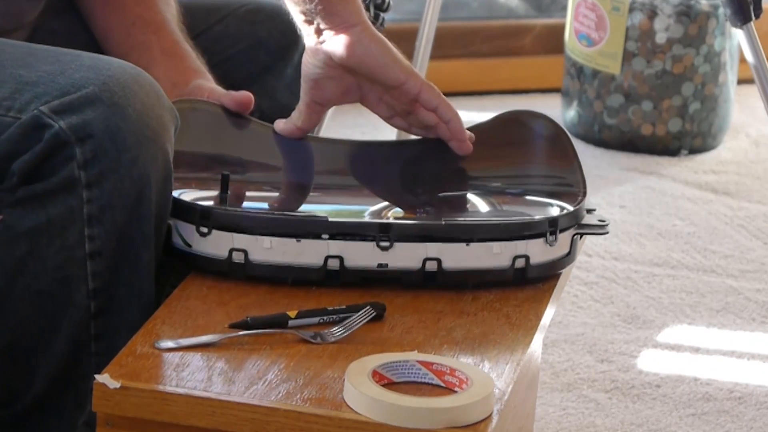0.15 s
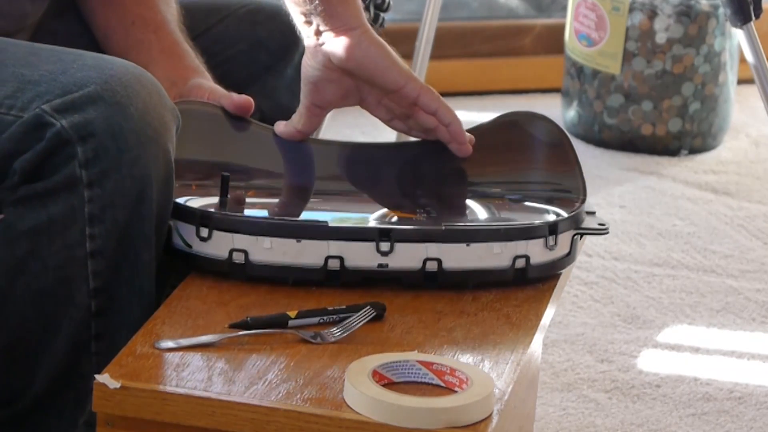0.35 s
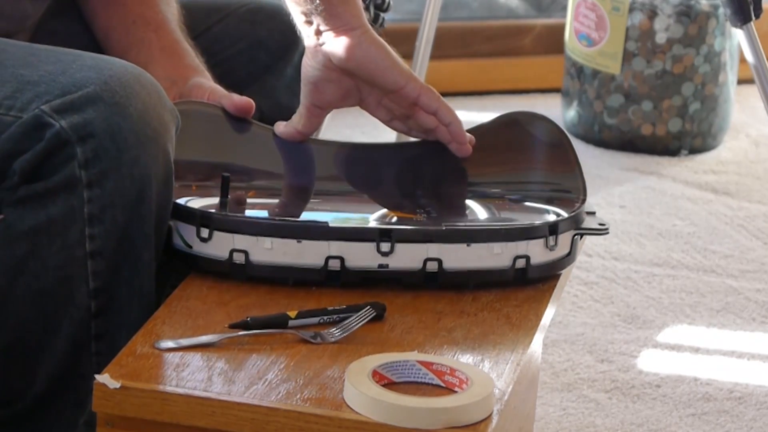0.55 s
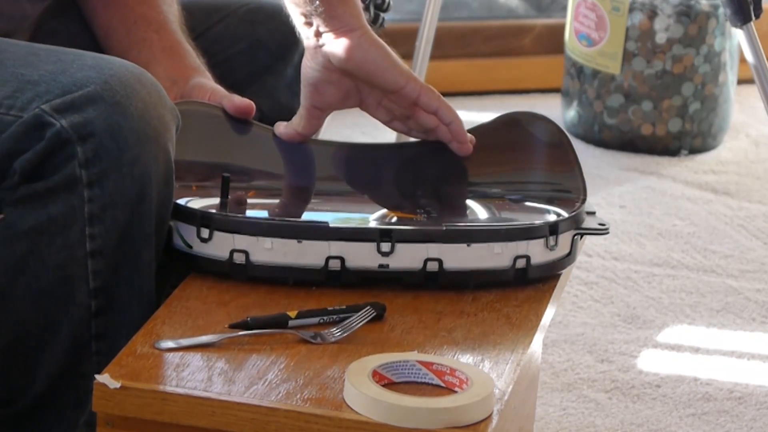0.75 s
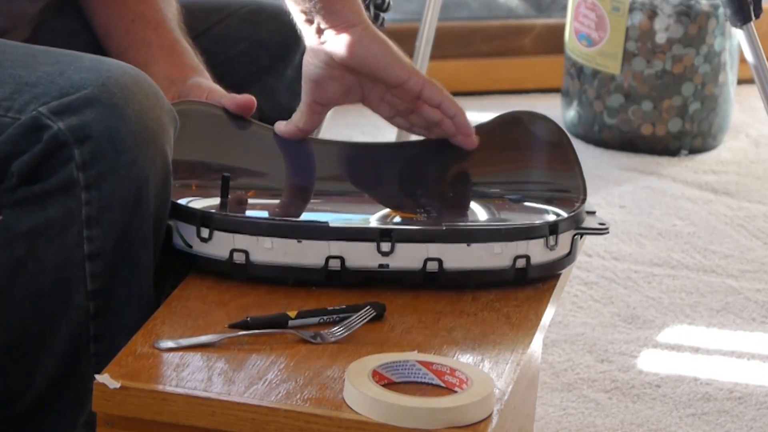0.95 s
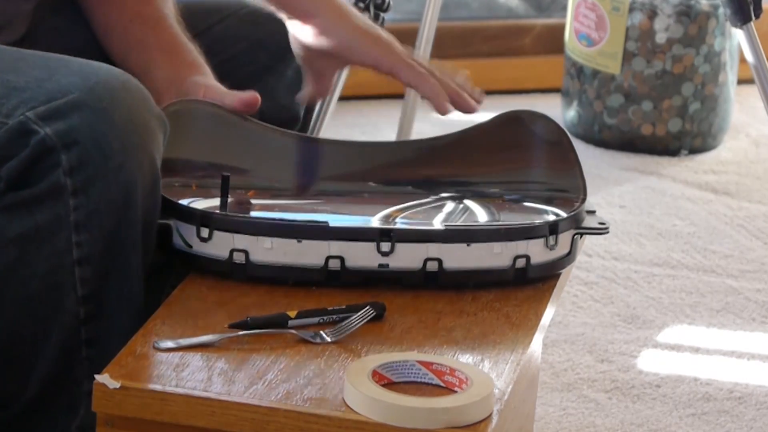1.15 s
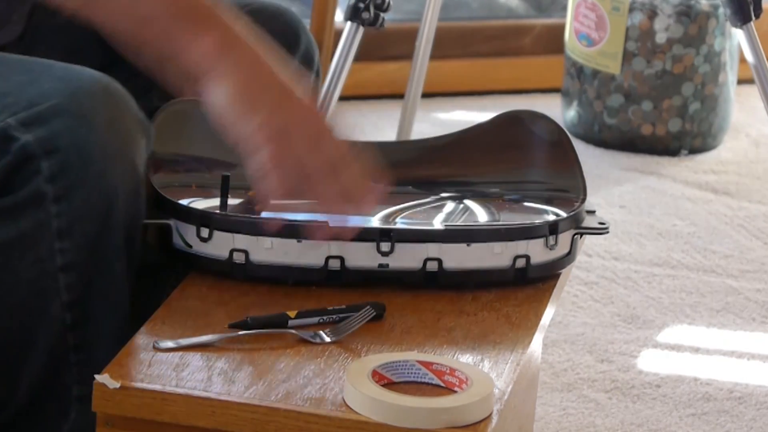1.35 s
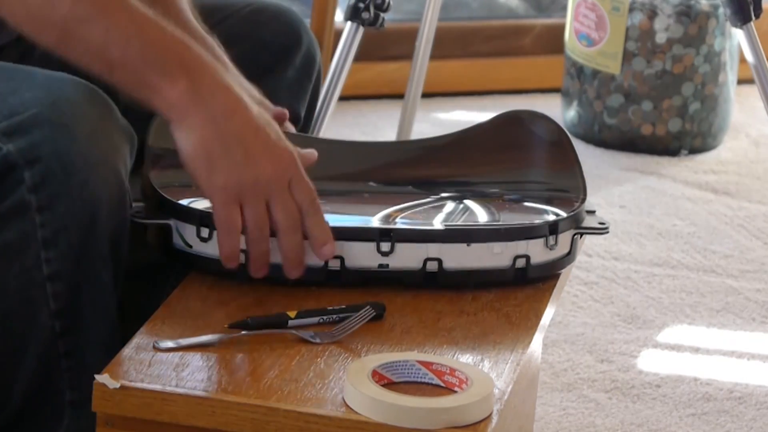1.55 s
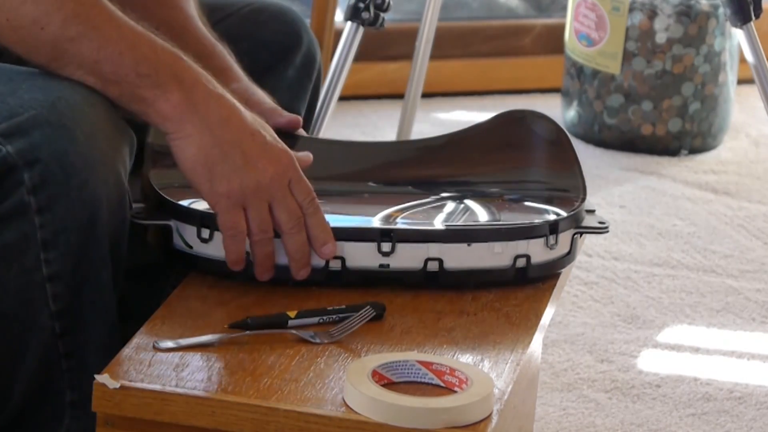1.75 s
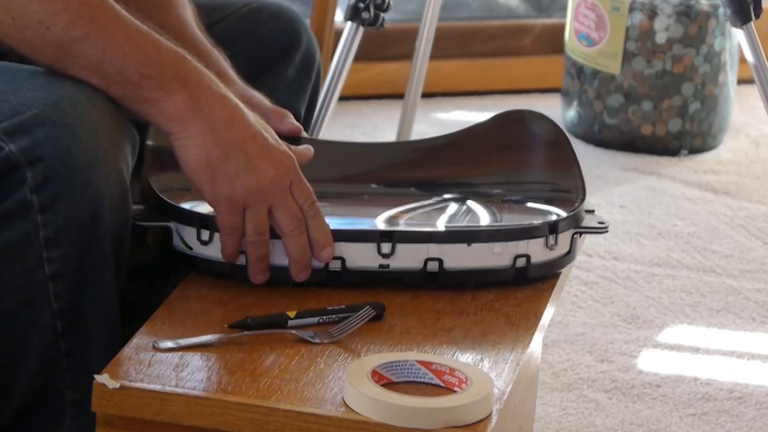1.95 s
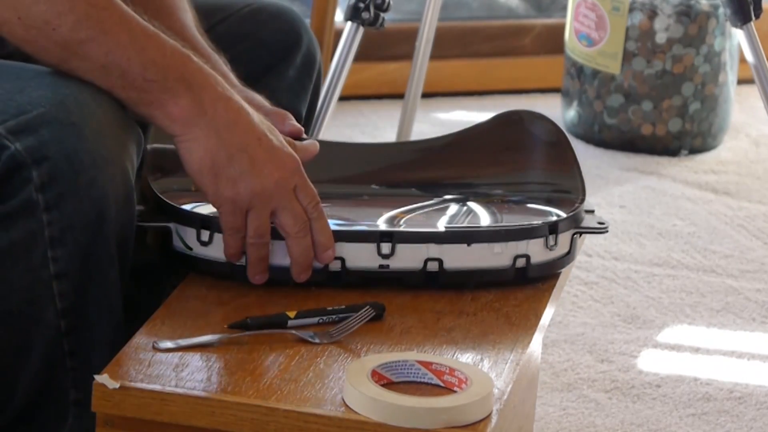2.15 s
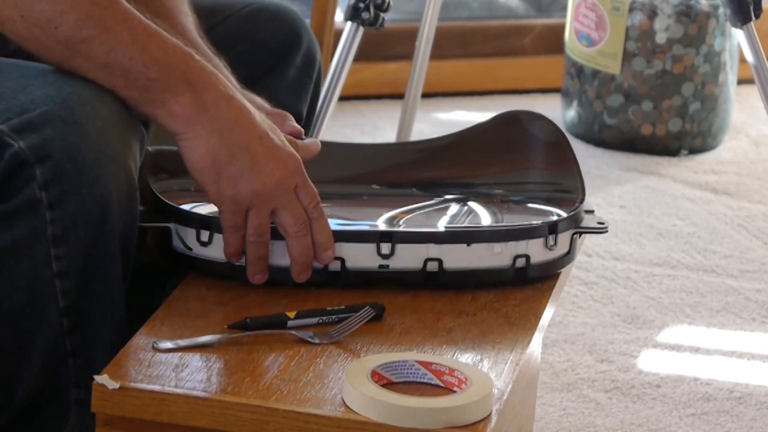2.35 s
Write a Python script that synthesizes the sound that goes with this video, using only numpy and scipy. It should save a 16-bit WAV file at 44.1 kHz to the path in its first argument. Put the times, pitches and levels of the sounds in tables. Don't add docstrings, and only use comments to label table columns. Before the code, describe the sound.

A clear plastic cover snaps sharply onto a hollow housing, loud enough to distort; after a quiet gap come soft knocks, finger rubs, a smaller click and short scrapes, heard close in a carpeted room with faint hum.

```python
import sys
import numpy as np
from scipy import signal
from scipy.io import wavfile

SR = 44100
rng = np.random.default_rng(int(sys.argv[2]) if len(sys.argv) > 2 else 0)


def to_linear_factor(level_db):
    exponent = np.asarray(level_db, float) / 20
    return 10 ** exponent


def bounce(signal):
    frames = np.transpose(np.atleast_2d(signal))
    limited = np.clip(frames, -1, 1)
    pcm = np.round(limited * 32767).astype(np.int16)
    wavfile.write(sys.argv[1], SR, pcm)


N = 105840

# pitch in Hz, level in dB rms, share of wavering noise, width of that noise in Hz.
HUM_LINES = [(59.2, -71, .2, 4), (118.6, -59.5, .15, 5), (238, -56, .5, 14), (441.2, -57, .15, 5),
             (597.5, -69, .3, 5)]
# time in seconds, level in dB.
HUM_SWELL = [
    (0, 1.5),
    (.85, -7),
    (1.2, -3),
    (1.7, 1),
    (2.4, 1.5),
]
# frequency in Hz, level in dB.
TONE_COLOUR = [(25, -25), (70, -11), (180, -8), (400, -6.5), (700, -14.5), (1500, -18.5), (5000, -23.5),
               (15000, -31.5)]
# frequency in Hz, likeness from -1 to 1.
TONE_ALIKE = [(60, 0.88), (180, 0.77), (550, 0.89), (1650, -0.14), (4970, -0.43), (15000, -0.063)]
ROOM_ALIKE = [(60, 0.84), (180, 1), (550, 0.99), (1650, 0.92), (4970, 0.34), (15000, -0.57)]
# frequency in Hz, t60 in seconds.
ROOM_T60 = [(120, 1.5), (300, 0.3628), (700, 0.4659), (2000, 0.482), (5000, 0.4247), (8000, 0.43),
            (12000, 0.2)]
# frequency in Hz, level in dB.
ROOM_COLOUR = [(100, -20.5), (300, 3), (700, 0), (2000, -2), (5000, -2), (9000, -6), (14000, 2)]
# start in seconds, length in seconds, level in dB, brightness in dB per octave.
FINGER_STROKES = [(0, 0.026, -50.5, -0.5), (.02, 0.088, -52.5, 2), (.13, 0.045, -47.5, 0),
                  (.94, 0.049, -51, -10.5), (1.03, 0.02, -48, 2.5), (1.04, 0.046, -38, -1),
                  (1.1, 0.25, -59.5, -4.5), (1.35, 0.32, -77, 3), (1.57, .14, -54.5, 0.5),
                  (1.79, 0.072, -55, -1), (1.965, 0.059, -40.5, -1)]
# start in seconds, length in seconds, level in dB,
# brightness in dB per octave.
DRAG_STROKES = [(0, 0.03, -46, -3), (.03, 0.044, -46.5, -2.5), (.62, 0.17, -55, -5), (1.15, 0.13, -61, -5),
                (1.61, 0.06, -54.5, 0.5), (2.143, 0.031, -44, 0.5), (2.175, .015, -49, 2),
                (2.193, 0.036, -43, 2), (2.236, .03, -46, 1.5), (2.274, .022, -48.5, 2),
                (2.3, 0.034, -52.5, -0.5), (2.326, 0.022, -47.5, 3)]
# frequency in Hz, width in Hz, level in dB.
SKIN_ON_SHELL = [(1370, 2150, -2.5), (2310, 460, -5), (3120, 370, -7), (4500, 1480, -0.5), (6350, 2200, -3),
                 (8950, 570, -6), (12100, 3800, -12)]
BASE_ON_TABLE = [(240, 24, -19), (444, 270, -3), (600, 63, -3.5), (820, 150, -7.5), (1350, 350, -9),
                 (2410, 280, -11.5), (3180, 200, -16), (3480, 420, -20)]
# start in seconds, peak in dB, pitch in Hz, length in seconds.
KNOCKS = [(0.2096, -16.5, 400, 0.0022), (.2132, -13.5, 527, 0.004), (.218, -1.5, 600, 0.004),
          (.232, -13, 600, 0.0028), (.243, -9.5, 537, 0.005), (.563, -36, 535, 0.008),
          (0.576, -45, 490, 0.0072), (.722, -44, 600, 0.0071), (.733, -37, 407, 0.0048),
          (0.867, -50, 450, 0.0073), (0.88, -40.5, 392, 0.0043), (0.934, -36.5, 400, 0.0088),
          (.95, -34.5, 468, 0.0084), (0.966, -23, 386, 0.0091), (0.986, -32.5, 406.5, 0.0172),
          (0.995, -31, 398, 0.0084), (1.01, -37, 377, 0.0099), (1.034, -34, 410, 0.0049),
          (1.07, -43, 630, 0.013), (1.979, -25.5, 615, 0.0043), (1.982, -25, 600, 0.0078),
          (2.009, -24.5, 310, 0.011)]
# start in seconds, peak in dB, brightness in dB per octave,
# share of the hollow body in dB.
SNAPS = [(0.148, -45, -7, -3), (0.16, -43.5, -1, -4), (0.2176, -2, 0.5, -7.5), (0.226, -13.5, 0, -17),
         (0.2327, -17, -5.5, -16), (0.626, -56, 3, -12), (0.9432, -46.5, 13.5, 9), (.951, -45, 5, 1),
         (.972, -42, -9, 0), (1.043, -24, -1.5, -14), (1.052, -34, 4.5, -10), (1.063, -35, -5, -20),
         (1.069, -31, -4.5, -8), (1.077, -33, 5.5, -11.5), (1.084, -45, 4, -6), (1.608, -52, 12, 4.5),
         (1.969, -49, 0, -16), (1.972, -37, -7, -8), (1.9801, -30.5, -8.5, -15), (1.9844, -15.5, 0, -15.5),
         (1.992, -26.5, 4, -14), (2.163, -48, 1, -3), (2.196, -42, -11, -12), (2.204, -56, -8, -13),
         (2.218, -53, 3, -5), (2.24, -47.5, -6.5, -7), (2.276, -62, -5, -14), (2.327, -48.5, -6, -11),
         (2.334, -53, -12, -15)]
# frequency in Hz, level in dB.
COVER_MODES = [(1050, -11), (1300, -13), (1620, -8.5), (2000, -7), (2500, -13), (2950, -5), (3700, -17.5),
               (4500, -5.5), (5250, 2), (6300, -16), (8100, 5.5), (9800, -1.5), (11800, -6), (14300, -0.5)]
SIDE_MODES = [(900, -18), (1300, -14.5), (1750, -10), (2300, -16), (2950, -3.5), (3600, -7), (4250, -0.5),
              (4900, -4.5), (5800, -11), (6900, -14), (8700, -5), (10800, -11), (13000, -23)]
# frequency in Hz, level in dB, t60 in seconds.
BODY_MODES = [(143.6, -32, 0.38), (237.8, -16, 0.27), (267, -17.5, .2), (310, -16.5, .1), (392, -11, 0.17),
              (461, -14, 0.2), (517, -12.5, 0.17), (596.2, -6, 0.12), (625, -11.5, 0.2), (783.3, -16, .15),
              (818, -13.5, 0.13), (964, -10, 0.12), (1104, -12, 0.13)]

TONE_DB = -51
ROOM_DB, FIRST_ECHO_S, EARLY_DB, EARLY_T60_S = -26.5, 0.0014, 2, 0.067
KNOCK_ROOM_DB, BODY_ROOM_DB, CHATTER_ROOM_SHARE = -11.5, -9.5, 0.35
FINGER_GRAINS_PER_S, DRAG_SLIPS_PER_S = 3700, 1000
RUB_FADE = 0.26
SIDE_FROM_S = 0.9
SHELL_DB, SHELL_CYCLES = -1, 11
CRACK_S, CHATTER_S, CHATTER_LOSS_DB = 0.0004, 0.0022, 2.5
BODY_LONGEST_T60_S = 0.35
PAN_DB, PAN_FROM_HZ = 3, 1800
PARTS_FROM_HZ, MIC_CUT_HZ = 120, 17500


def at_hz(points, hz):
    table_hz, values = np.transpose(points)
    return np.interp(np.log(hz), np.log(table_hz), values)


def rms_one(x):
    return x / np.sqrt(np.mean(x ** 2) + 1e-20)


def ring(clicks, hz, t60):
    r = to_linear_factor(-60 / (t60 * SR))
    w = 2 * np.pi * hz / SR
    return signal.lfilter([0, np.sin(w)], [1, -2 * r * np.cos(w), r * r], clicks + 1e-18)


def t60_of(width_hz):
    return np.log(1000) / np.pi / width_hz


def drift(rate):
    r = np.exp(-80 * np.pi * rate / SR)
    slow = signal.lfilter([1], [1, -2 * r, r * r], rng.standard_normal(N // 40 + 2002))[2000:]
    return np.interp(np.arange(N) / 40, np.arange(len(slow)), rms_one(slow))


def bands(likeness, gain, size):
    out = 0
    edges = 22 * 2 ** np.arange(0, 9.6, 0.5)
    white = rng.standard_normal((2, 2, size))
    for k, (low, high) in enumerate(zip(edges, edges[1:])):
        band = signal.butter(2, [low, high], "band", fs=SR, output="sos")
        mid, side = signal.sosfilt(band, white[k % 2])
        hz = np.sqrt(low * high)
        alike = np.clip(at_hz(likeness, hz), -1, 1)
        out = out + gain(hz) * (np.sqrt(1 + alike) * mid + np.sqrt(1 - alike) * side * [[1], [-1]])
    return out


def room_tone():
    tone = bands(TONE_ALIKE, lambda hz: to_linear_factor(at_hz(TONE_COLOUR, hz) + 1.65 * drift(6.7)), size=N)
    return to_linear_factor(TONE_DB) * rms_one(tone)


def appliance_hum():
    t, out = np.arange(N) / SR, 0
    for hz, db, waver, width_hz in HUM_LINES:
        noise = rms_one(ring(rng.standard_normal(N + SR), hz, t60_of(width_hz))[SR:])
        steady = np.sqrt(2) * np.sin(2 * np.pi * hz * t)
        out = out + to_linear_factor(db) * rms_one((1 - waver) * steady + waver * noise)
    return out * to_linear_factor(np.interp(t, *np.transpose(HUM_SWELL)))


def room_echoes(x):
    t = np.arange(SR * 3 // 4) / SR
    early = 1 + to_linear_factor(EARLY_DB - 60 * t / EARLY_T60_S)

    def decay(hz):
        return to_linear_factor(at_hz(ROOM_COLOUR, hz) - 60 * t / at_hz(ROOM_T60, hz))

    echoes = bands(ROOM_ALIKE, decay, size=len(t))
    echoes = echoes * early * np.clip(t / FIRST_ECHO_S - 1, 0, 1)
    return to_linear_factor(ROOM_DB) * signal.fftconvolve(echoes, x[None], axes=1)[:, :N]


def rub(strokes, resonances, per_s, spread_db):
    t, out = np.arange(N) / SR, 0
    slips = rng.random(N) < per_s / SR
    force = to_linear_factor(spread_db * np.minimum(rng.exponential(1, N), 4))
    grains = slips * force * rng.choice([-1, 1], N)
    for k, (hz, width_hz, level_db) in enumerate(resonances):
        octaves = np.log2(hz / resonances[1][0])
        press = 0
        for s, length, db, tilt_db in strokes:
            to_nearest_end = np.minimum(t - s, s + length - t)
            fade = np.clip(to_nearest_end / (RUB_FADE * length), 0, 1)
            press = press + to_linear_factor(db + tilt_db * octaves) * fade
        rung = rms_one(ring(grains * rng.uniform(0.41, 1, N), hz, t60_of(width_hz)))
        out = out + to_linear_factor(level_db - 6.0) * press * rung * (-1) ** k
    return out


def knocks():
    out, t = np.zeros(N + SR), np.arange(SR // 20) / SR
    for s, db, hz, length in KNOCKS:
        swell = np.sin(np.pi * np.clip(t / length, 0, 1))
        start = int(s * SR)
        out[start:start + len(t)] += to_linear_factor(db) * np.sin(2 * np.pi * hz * t) * swell
    return out[:N]


def snaps():
    cover, chatter, body = np.zeros((3, N))
    s, db, tilt_db, body_db = np.transpose(SNAPS)
    luck = rng.standard_normal((len(s), 40))
    waits = rng.exponential(1, (len(s), 40, 5))
    crack = waits[:, :, :1]
    late_s = CRACK_S * crack + CHATTER_S * (np.cumsum(waits, axis=2) - crack)
    shell = [(*mode, s < SIDE_FROM_S) for mode in COVER_MODES]
    shell += [(*mode, s >= SIDE_FROM_S) for mode in SIDE_MODES]
    for k, (hz, level_db, struck) in enumerate(shell):
        bright_db = tilt_db * np.log2(hz / 4000)
        first = struck * to_linear_factor(db + level_db + bright_db + SHELL_DB + 1.44 * luck[:, k])
        at = ((s[:, None] + late_s[:, k]) * SR).astype(int)
        clicks, later = np.zeros((2, N))
        clicks[at[:, 0]] = first
        later[at[:, 1:]] = first[:, None] * to_linear_factor(-CHATTER_LOSS_DB * np.arange(1, 5))
        cover += ring(clicks, hz, SHELL_CYCLES / hz) * (-1) ** k
        chatter += ring(later, hz, SHELL_CYCLES / hz) * (-1) ** k
    for k, (hz, level_db, t60) in enumerate(BODY_MODES):
        clicks = np.zeros(N)
        clicks[(s * SR).astype(int)] = to_linear_factor(db + body_db + level_db + 1.2 * luck[:, -k - 1]) * (-1) ** k
        body += ring(clicks, hz, np.minimum(t60, BODY_LONGEST_T60_S))
    return cover, chatter, body


def scene():
    background = room_tone() + appliance_hum()
    fingers = rub(FINGER_STROKES, SKIN_ON_SHELL, FINGER_GRAINS_PER_S, spread_db=2.5)
    drags = rub(DRAG_STROKES, BASE_ON_TABLE, DRAG_SLIPS_PER_S, spread_db=3.0)
    dull = knocks()
    cover, chatter, body = snaps()
    parts = cover + chatter + fingers + drags
    treble = signal.lfilter(*signal.butter(1, PAN_FROM_HZ, "high", fs=SR), parts)
    lean = to_linear_factor([[PAN_DB / 2], [-PAN_DB / 2]]) - 1
    direct = parts + body + dull + treble * lean
    to_room = parts - (1 - CHATTER_ROOM_SHARE) * chatter
    to_room = to_room + to_linear_factor(BODY_ROOM_DB) * body + to_linear_factor(KNOCK_ROOM_DB) * dull
    low_cut = signal.butter(2, PARTS_FROM_HZ, "high", fs=SR, output="sos")
    return signal.sosfilt(low_cut, direct + room_echoes(to_room)) + background


def band_limit(x):
    return signal.sosfilt(signal.butter(12, 15980, fs=SR, output="sos"), x)


def record(dry):
    top_cut = signal.butter(4, MIC_CUT_HZ, fs=SR, output="sos")
    mix = np.clip(signal.sosfilt(top_cut, dry), -1, 1)
    return band_limit(mix)


dry = scene()
out = record(dry)
bounce(out)
```